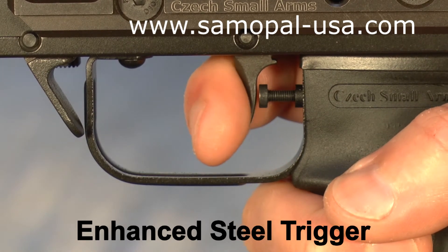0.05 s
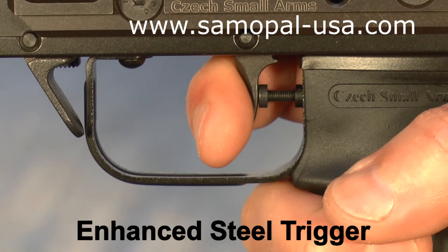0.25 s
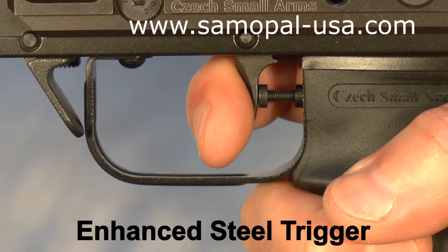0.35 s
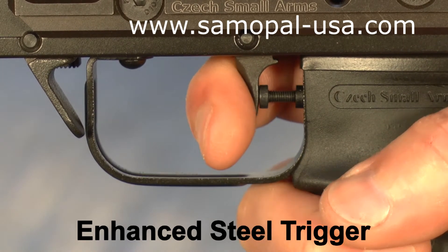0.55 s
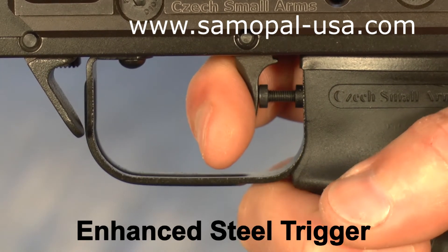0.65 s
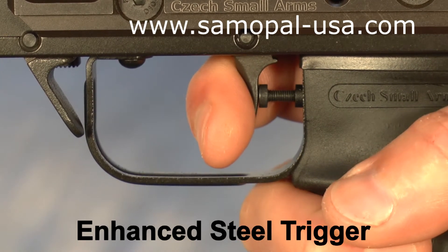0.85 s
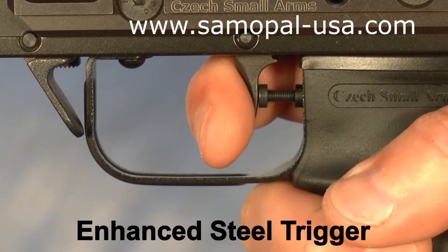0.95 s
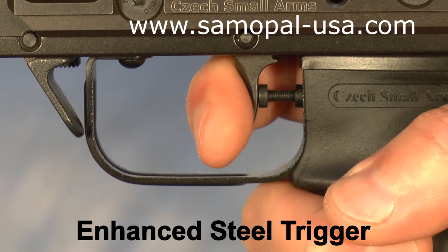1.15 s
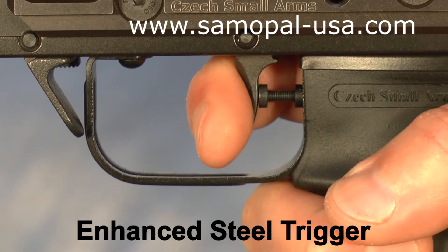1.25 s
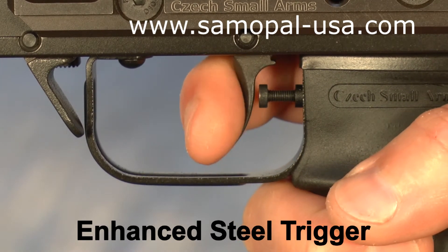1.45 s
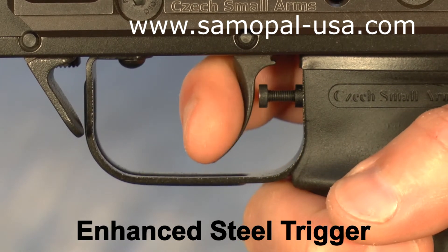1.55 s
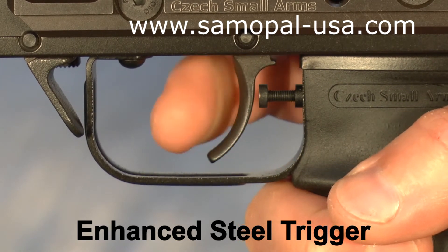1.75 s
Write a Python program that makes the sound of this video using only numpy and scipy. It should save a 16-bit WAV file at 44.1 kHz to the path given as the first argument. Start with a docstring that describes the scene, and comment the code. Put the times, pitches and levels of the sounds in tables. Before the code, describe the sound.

A rifle is dry-fired close by, slightly right: a sharp steel snap at 0.2 seconds, with faintly ringing springs. From about 0.55 seconds the bolt clicks and scrapes back, slamming home at 0.8. The blows echo in a bare room over a faint low rumble. Near 1.5 seconds the trigger resets with a lighter, crisp click.

```python
"""A rifle is dry-fired close by, slightly to the right, in a bare, ringing room.
At 0.2 s the hammer falls: steel snaps on steel, the gun jolts and its springs sing on faintly.
From 0.53 s the bolt is drawn back, clicking and scraping; at 0.78 s it slams home.
The hand shifts on the grip, then at 1.47 s the eased trigger resets with a quick double click.
A limiter ducks each loud blow, so the room's tail swells back behind it, over a low rumble."""
import sys
import numpy as np
from scipy import signal
from scipy.fft import rfft, irfft
from scipy.io import wavfile
from scipy.ndimage import uniform_filter1d

SR = 44100
rng = np.random.default_rng(int(sys.argv[2]) if len(sys.argv) > 2 else 0)


def dump_mix(stems):
    """Bounce the given channels to the path in sys.argv[1] as a 16-bit WAV at rate SR."""
    frames = np.atleast_2d(stems).T  # one column per channel
    limited = np.clip(frames, -1, 1)  # hard clip at full scale
    pcm = np.round(limited * 32767).astype(np.int16)
    wavfile.write(sys.argv[1], SR, pcm)


N = 79380
RISE_S, NEAR_LIKENESS = 0.00018, 0.65

# Receiver response: (frequency [Hz], density [dB])
RECEIVER_SPECTRUM = [(30, -44), (120, -20), (370, -7), (540, -22.5), (780, 1.5), (1000, -14.5),
                     (1500, -6.5), (2100, -3), (2800, 4), (3900, 1), (5200, -0.5), (6400, 3.5), (7300, 2.5),
                     (9200, 2.5), (10300, -6.5), (11100, -6.5), (12300, -23.5), (13900, -12), (15000, -41),
                     (16000, -16)]
# Tint bands low, mid, upper, reference, top: (frequency [Hz])
TINT_HZ = (900, 3000, 6000, 8700, 13000)
# Steel impacts: (time [s], level [dB], decay [s], low tint [dB], mid tint [dB], upper tint [dB],
# top tint [dB], ring frequency [Hz], ring re snap [dB])
IMPACTS = [ (0.0161, -45.5, 0.0016, 8, 22.5, 16, 8, 3790, 0),
           (0.1974, -18.5, 0.0057, 4.5, 11, 5.5, 19, 2840, -12.5),
           (0.2017, -34.5, 0.0027, 3, -18, -4, 7, 8100, 9),
           (0.2047, -3, .0025, 0.5, -20, -3.5, 15.5, 2540, -13),
           (0.208, 6.5, 0.0049, -7.5, -1, -2, 7.5, 8840, -21),
           (0.5351, -28, 0.00083, 20, 14, 5, -18, 2230, -3.5),
           (0.5849, -12.5, 0.00091, -2, 0, 3.5, 13, 6020, -5),
           (.5907, -3, 0.0011, -9, -3, -5.5, -1, 8830, -2.5),
           (0.6004, -7, 0.0012, -5.5, 1.5, -21, 13, 7850, -2.5),
           (.6270, -14, .005, 6, 11, 2, -3.5, 3080, -13),
           (0.6323, -13, 0.0033, 7, -0.5, -10, -6, 3930, 0.5), (.6470, -15, 0.0037, 2, 2, -3, 10, 3030, -2),
           (.6535, -14.5, .002, 21.5, 16.5, -18, 10, 3830, 7),
           (0.656, -14.5, 0.004, 10.5, 6.5, -17, 9, 4820, -0.5),
           (0.6745, -2.5, 0.0027, -0.5, 5, 1, 14, 2485, -10.5),
           (0.6755, -3.5, 0.0039, 15.5, 19.5, 2, -6, 3813, 0),
           (0.749, -12.5, 0.0033, 1.5, 6, 3, 12, 2950, -9),
           (0.782, 6.5, 0.0015, 1, 2.5, 4.5, 15.5, 6900, -10),
           (0.7915, -0.5, 0.0023, 16.5, 13, 6, 5, 4320, -2.5)]


def hammer_and_bolt(ring_decay_s=0.0026):
    """Hammer and bolt hit the receiver: a snap plus the ring of the struck part."""
    out = np.zeros((2, N))
    for start_s, db, decay_s, low, mid, upper, top, ring_hz, ring_db in IMPACTS:
        tint = list(zip(TINT_HZ, (low, mid, upper, 0, top)))
        click = snap(decay_s, [RECEIVER_SPECTRUM, tint], after_db=-12)
        t = np.arange(click.shape[1]) / SR
        tone = unit_blow(np.exp(-t / ring_decay_s) * np.sin(2 * np.pi * ring_hz * t))
        add(out, start_s, amp(db) * unit_blow(click + amp(ring_db) * tone))
    return out


def snap(decay_s, spectra, after_db, after_s=0.017, size=4096):
    """Crowded modes of struck steel: shaped noise with a fast decay and a weaker, slower one."""
    t, hz = np.arange(size) / SR, np.fft.rfftfreq(2 * size, 1 / SR)
    envelope = rise(t) * (np.exp(-t / decay_s) + amp(after_db) * np.exp(-t / after_s))
    burst = rfft(rng.standard_normal((2, size)) * envelope, 2 * size)
    whitened = burst / np.sqrt(uniform_filter1d(abs(burst) ** 2, size=120))
    colour = amp(sum(curve(spectrum, hz) for spectrum in spectra))
    return unit_blow(irfft(stereo(whitened, NEAR_LIKENESS) * colour)[:, :size])


# Stock modes: (frequency [Hz], level [dB], T60 [s])
STOCK_MODES = [(269, 0.5, 0.018), (403, -10.5, 0.01)]
# Gun jolts: (time [s], push level [dB], push time constant [s], knock level [dB], room send [dB])
GUN_JOLTS = [(.2106, -5.5, 0.001, -2, -12.5), (0.5832, -46, 0.0039, -53, -9),
             (0.6758, -25, 0.0022, -21.5, 4), (0.7821, -6, 0.0011, -46, -4.5)]


def jolts():
    """Heavy blows shove the gun: a push of air and a dull knock. Returns direct sound and room send."""
    direct, send, t = np.zeros((2, N)), np.zeros((2, N)), np.arange(SR // 10) / SR
    knock = sum(amp(db - 60 * t / t60) * np.sin(2 * np.pi * hz * t) for hz, db, t60 in STOCK_MODES)
    for start_s, push_db, push_s, knock_db, send_db in GUN_JOLTS:
        age = t / push_s
        push = age ** 2 * (1 - age / 3) * np.exp(-age)
        thump = -amp(push_db) * push / push.max() - amp(knock_db) * knock
        add(direct, start_s, thump)
        add(send, start_s, amp(send_db) * thump)
    return direct, send


# Rail tint on the receiver response: (frequency [Hz], gain [dB])
RAIL_TINT = [(500, -5.5), (1200, 12), (3000, 4), (6000, 2.5), (9000, -0.5), (14000, 1)]
# Bolt travel: (time [s], duration [s], level [dB])
BOLT_STROKES = [(0.6, .066, -21.5), (0.765, 0.014, -26)]


def bolt_scrape(catches_per_s=10000):
    """The bolt slides on its rails: dense tiny catches ring the receiver."""
    out = np.zeros((2, N))
    catches = stereo(rng.standard_normal((2, N)), NEAR_LIKENESS) * (rng.random(N) < catches_per_s / SR)
    scrape = coloured(catches, RECEIVER_SPECTRUM, RAIL_TINT)
    for start_s, length_s, db in BOLT_STROKES:
        add(out, start_s, amp(db) * span(scrape, start_s, length_s))
    return out


# Sear snap: (frequency [Hz], density [dB])
SEAR_SPECTRUM = [(100, -38), (560, -40), (780, -10.5), (1500, -16), (2500, -2.5), (4300, -5.5),
                 (6300, -0.5), (9000, -3.5), (12000, -14), (16000, -18)]
# Sear clicks: (time [s], level [dB])
SEAR_CLICKS = [(1.4681, -17), (1.4701, -22.5)]
# Trigger modes: (frequency [Hz], level [dB], T60 [s])
TRIGGER_MODES = [(783, -11, 0.07), (1110, -13, 0.1), (2480, -2, 0.034), (2910, -32.5, 0.049),
                 (3260, -18.5, 0.033), (5100, -21, 0.046), (5660, 7, 0.017), (6190, -0.5, 0.027),
                 (6690, -10, 0.044), (7680, -20, 0.046), (8610, -3, 0.033), (10160, -4, 0.038),
                 (14750, -14.5, 0.035)]


def trigger_reset(snap_gain_db=-1, ring_gain_db=-4.5):
    """The sear slips over in two clicks; the first rings the trigger."""
    out, t = np.zeros((2, N)), np.arange(SR // 5) / SR
    for start_s, db in SEAR_CLICKS:
        click = snap(decay_s=0.0018, spectra=[SEAR_SPECTRUM], after_db=-12.5)
        add(out, start_s, amp(db + snap_gain_db) * click)
    ring = sum(amp(db - 60 * t / t60) * np.sin(2 * np.pi * (hz * t + rng.random()))
               for hz, db, t60 in TRIGGER_MODES)
    first_s, first_db = SEAR_CLICKS[0]
    add(out, first_s, amp(first_db + ring_gain_db) * unit_blow(ring * rise(t)))
    return pan(out, left_db=-8.5)


# Bolt unseated and let go; springs kicked by the big blows: (time [s], level [dB])
BOLT_HITS = [(.5998, -29), (.7494, -30)]
SPRING_HITS = [(.2094, -35.5), (0.7818, -49)]
# Their modes: (frequency [Hz], level [dB], T60 [s])
BOLT_MODES = [(2320, -14, 0.31), (2650, -20, .4), (7821, 2, .25), (7700, 0.5, 0.29), (8280, -11, .2),
              (9900, -11.5, .15), (13130, -17, 0.43), (13720, -3, .4), (14000, -11, .45)]
SPRING_MODES = [(828, -16.5, 1.1), (1720, -8, 1.6), (2955, 0.5, 2.7), (6420, -1, 2.3), (8850, 12, .7),
                (9550, -4, 1.8), (11700, 0, 1.3), (14100, -11.5, 0.2), (14620, -10, .6)]


def singing_steel(hits, modes, linewidth_hz=12.7):
    """Each hit sets a steel part ringing in thin tones that shimmer as their phases drift."""
    out, t = np.zeros((2, N)), np.arange(N) / SR
    for start_s, hit_db in hits:
        for hz, mode_db, t60 in modes:
            drift = np.cumsum(rng.standard_normal(N)) * np.sqrt(2 * np.pi * linewidth_hz / SR)
            phase = 2 * np.pi * hz * t + uniform_filter1d(drift, size=200)
            add(out, start_s, amp(hit_db + mode_db - 60 * t / t60) * rise(t) * np.sin(phase))
    return out


# Direct path: (frequency [Hz], left re right [dB])
DIRECT_BALANCE = [(60, 7.5), (110, -5), (200, 3), (380, -12), (700, -10.5), (1290, -0.5), (2380, -3),
                  (4400, -13.5), (8120, -8.5), (15000, -10.5)]


def direct_path(x):
    """The gun sits to the right; its level on the left varies with frequency."""
    left_gain = amp(curve(DIRECT_BALANCE, np.fft.rfftfreq(2 * N, 1 / SR)))
    left = irfft(rfft(x[0], 2 * N) * left_gain)[:N]
    return np.array([left, x[1]])


# Room decay: (frequency [Hz], T60 [s])
TAIL_T60 = [(100, 3.66), (350, 1.93), (800, 1.1), (2000, 1.284), (3500, 1.204), (6000, 0.84), (9000, 0.67),
            (14000, 0.23)]
# Room colour: (frequency [Hz], gain [dB])
TAIL_GAIN = [(40, -37.5), (100, -9.5), (250, -9.5), (420, 1), (560, -11.5), (830, -6.5), (1200, -9.5),
             (1900, -8.5), (3000, -11.5), (6000, -9.5), (9000, -12), (12000, -13.5), (14000, -8),
             (16000, -20.5)]
# Room balance: (frequency [Hz], left re right [dB])
TAIL_BALANCE = [(110, -2), (220, 2.5), (400, -9), (800, -15.5), (4000, -12.5), (15000, -20.5)]
# Room width: (frequency [Hz], left-right likeness [0..1])
TAIL_LIKENESS = [(60, 0.46), (130, 0.93), (300, .1), (1400, 0.31), (4000, 0.22), (15000, 1)]


def room_tail(build_s=0.00443):
    """Diffuse impulse response; the treble dies first."""
    hz, t, noise = signal.stft(rng.standard_normal((2, N)), SR, nperseg=512)
    hz = hz[:, None]
    decay_per_s = np.log(1000) / curve(TAIL_T60, hz)
    envelope = np.exp(-decay_per_s * t) * np.sqrt(2 * decay_per_s / SR)  # unit energy
    bands = stereo(noise, curve(TAIL_LIKENESS, hz)) * amp(curve(TAIL_GAIN, hz)) * envelope
    bands[0] *= amp(curve(TAIL_BALANCE, hz))
    return signal.istft(bands, SR, nperseg=512)[1][:, :N] * rise(np.arange(N) / SR, build_s)


def room(send, tails=3, turn_s=0.0016):
    """The right channel feeds several tails in turn, so the echo is an even wash."""
    out, turn = np.zeros((2, N)), np.arange(N) / SR / turn_s
    for k in range(tails):
        distance = abs((turn - k) % tails - tails / 2)
        crossfade = np.cos(np.pi / 2 * np.minimum(distance, 1))
        out += signal.fftconvolve(send[1:] * crossfade, room_tail(), axes=1)[:, :N]
    return out


# Grip rumble: (frequency [Hz], density [dB])
GRIP_SPECTRUM = [(20, -31), (55, -32.5), (85, 5.5), (125, -6.5), (200, -9), (500, -26), (2000, -70)]
# Hand shifts: (time [s], duration [s], level [dB])
GRIP_SHIFTS = [(0.399, 0.1, -58), (0.92, 0.44, -54), (1.363, .14, -51)]


def hand_on_grip():
    """The shifting hand makes soft swells of rumble."""
    out = np.zeros((2, N))
    rumble = coloured(stereo(rng.standard_normal((2, N)), likeness=0.41), GRIP_SPECTRUM)
    for start_s, length_s, db in GRIP_SHIFTS:
        swell = span(rumble, start_s, length_s)
        add(out, start_s, amp(db) * swell * signal.windows.tukey(swell.shape[1], 0.5))
    return out


# Room noise: (frequency [Hz], density [dB])
ROOM_TONE_SPECTRUM = [(20, -8), (60, -9.5), (110, 4.5), (170, -3.5), (350, -11), (600, -17.5), (1100, -20),
                      (2200, -10.5), (3200, -22), (5000, -25.5), (8000, -35.5), (14000, -32), (16000, -59)]


def room_tone(level_db=-57):
    """Low rumble and faint hiss of the quiet room."""
    noise = stereo(rng.standard_normal((2, N)), likeness=0.41)
    return amp(level_db) * coloured(noise, ROOM_TONE_SPECTRUM)


def amp(db):
    return 10 ** (np.asarray(db) / 20)


def rise(t, time_s=RISE_S):
    return 1 - np.exp(-t / time_s)


def curve(points, hz):
    """Interpolates on a log-frequency axis."""
    knots_hz, values = np.transpose(points)
    return np.interp(np.log(hz + 1), np.log(knots_hz + 1), values)


def coloured(x, *spectra):
    """Filters by the summed dB curves; unit RMS."""
    hz = np.fft.rfftfreq(N, 1 / SR)
    shaped = irfft(rfft(x) * amp(sum(curve(spectrum, hz) for spectrum in spectra)), N)
    return shaped / np.sqrt(np.mean(shaped ** 2) + 1e-20)


def unit_blow(x):
    """Scales to the energy of 5 ms at full level."""
    return x * np.sqrt(0.005 * SR / np.mean(np.sum(x ** 2, -1)))


def stereo(x, likeness):
    """Mixes two independent signals into a correlated left and right."""
    return np.array([likeness * x[1] + np.sqrt(1 - likeness ** 2) * x[0], x[1]])


def pan(x, left_db):
    return x * amp([[left_db], [0]])


def span(x, start_s, length_s):
    return x[:, round(start_s * SR):round((start_s + length_s) * SR)]


def add(mix, start_s, sound):
    part = mix[:, round(start_s * SR):][:, :sound.shape[-1]]
    part += sound[..., :part.shape[1]]


def scene():
    """Direct gun sound, its echo, then the background."""
    steel = hammer_and_bolt() + bolt_scrape()
    reset = trigger_reset()
    thumps, thump_send = jolts()
    bolt_ring = singing_steel(BOLT_HITS, BOLT_MODES)
    springs = pan(singing_steel(SPRING_HITS, SPRING_MODES), left_db=-8)
    direct = direct_path(steel + bolt_ring) + reset + thumps + springs
    echo = room(steel + amp(-2) * reset + thump_send)
    return direct + echo + hand_on_grip() + room_tone()


def record(dry):
    """Fast, partly linked stereo limiter with slow release; clipping at full scale; low-pass."""
    threshold_db, slope, link = -10.5, 0.86, 0.69
    attack_s, release_db_per_s, cutoff_hz = 0.00013, 90.5, 16000
    power = abs(uniform_filter1d(dry ** 2, size=88, axis=1)) + 1e-12
    release_db = np.arange(N) / SR * release_db_per_s
    held_db = np.maximum.accumulate(10 * np.log10(power) + release_db, axis=1) - release_db
    over_db = np.maximum(held_db - threshold_db, 0)
    linked_db = link * over_db.max(0) + (1 - link) * over_db
    pole = np.exp(-1 / (attack_s * SR))
    duck_db = slope * signal.lfilter([1 - pole], [1, -pole], linked_db)
    clipped = np.clip(dry / amp(duck_db), -1, 1)
    lowpass = signal.firwin(255, cutoff_hz, window=("kaiser", 8), fs=SR)
    return signal.oaconvolve(clipped, lowpass[None], "same")


dry = scene()
out = record(dry)
dump_mix(out)
```